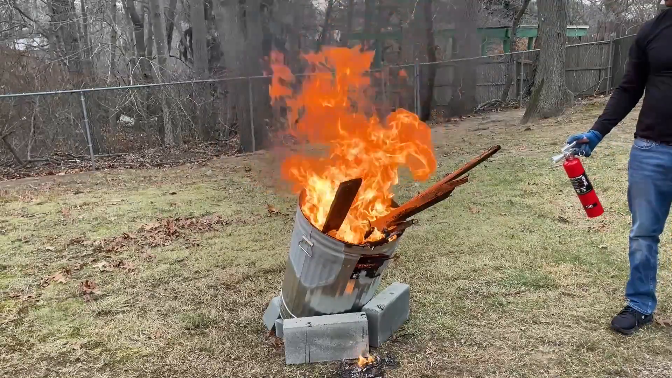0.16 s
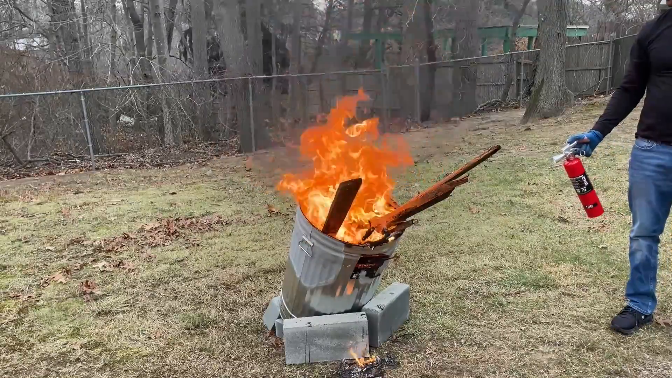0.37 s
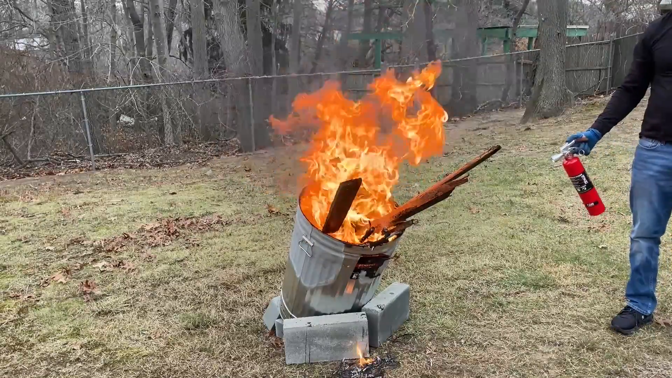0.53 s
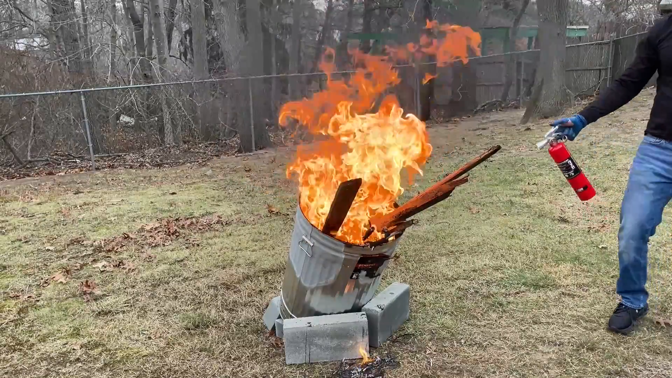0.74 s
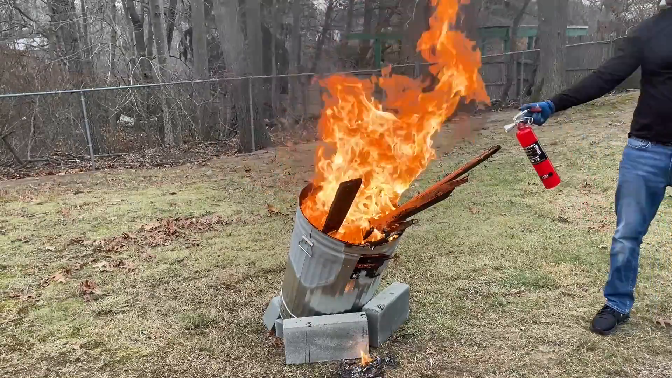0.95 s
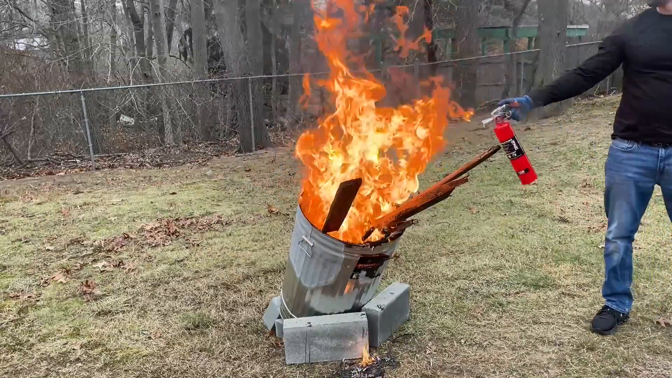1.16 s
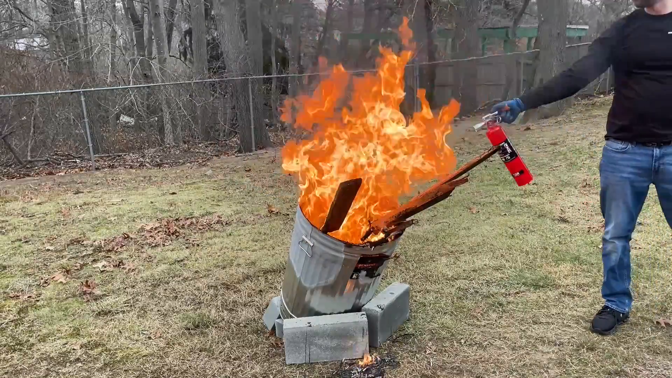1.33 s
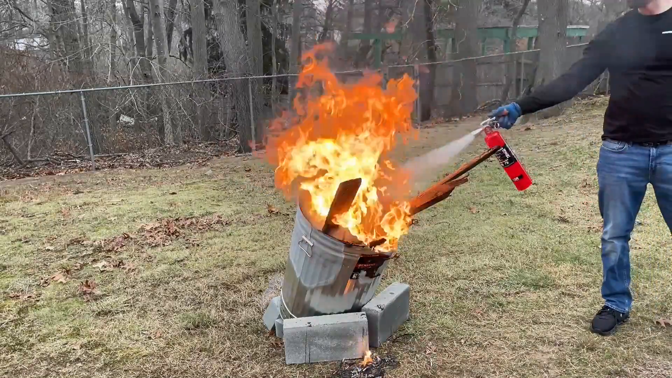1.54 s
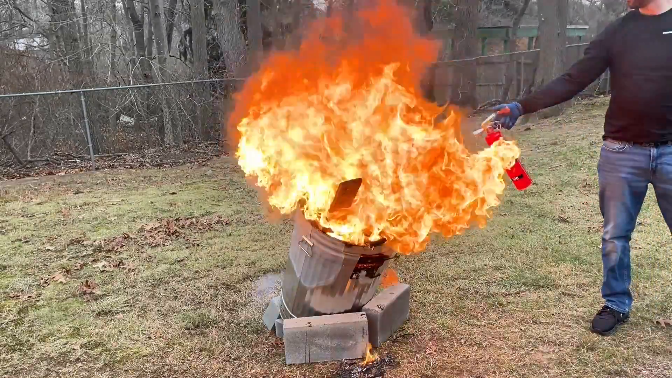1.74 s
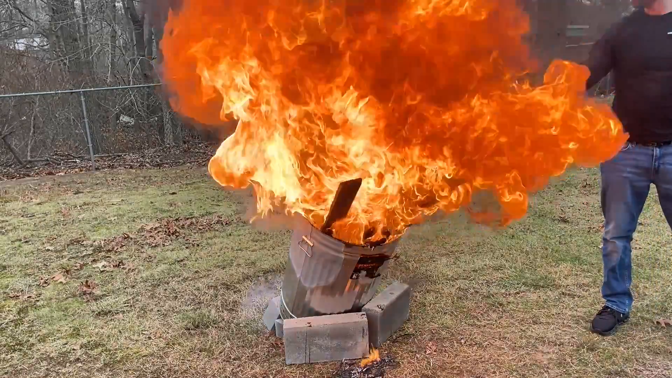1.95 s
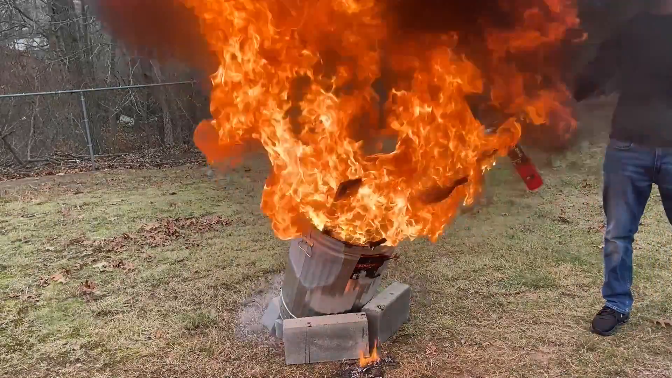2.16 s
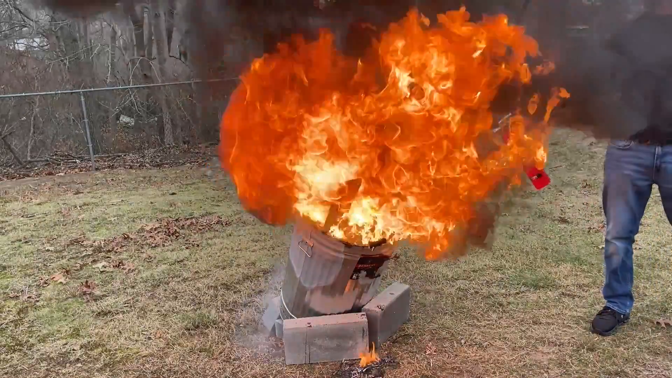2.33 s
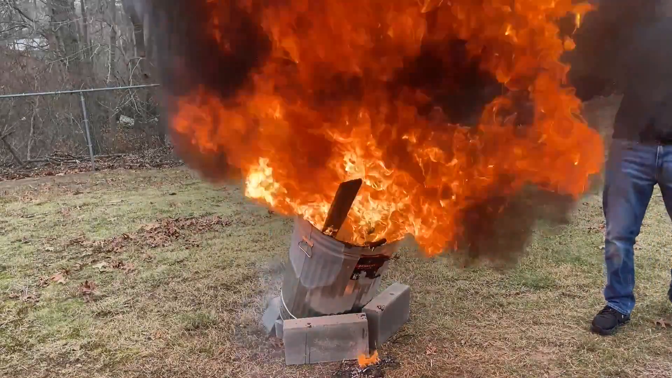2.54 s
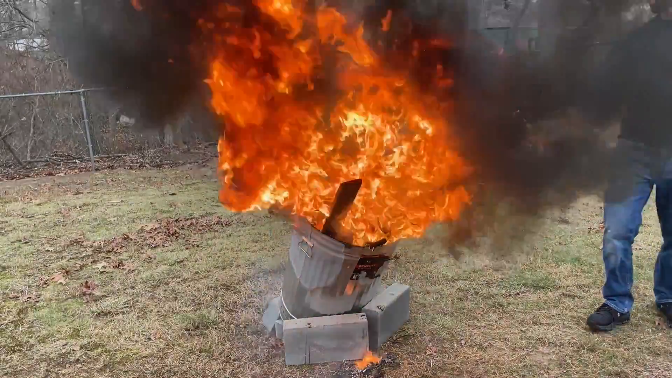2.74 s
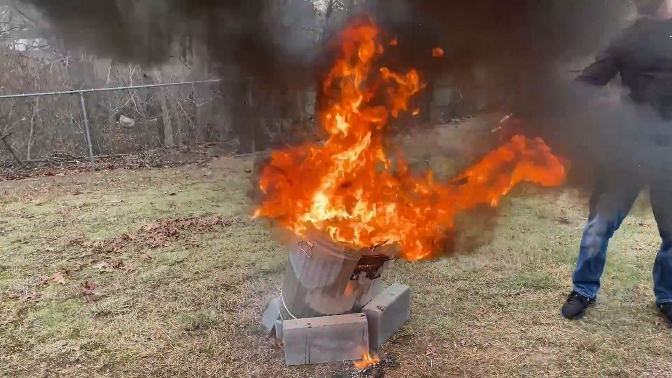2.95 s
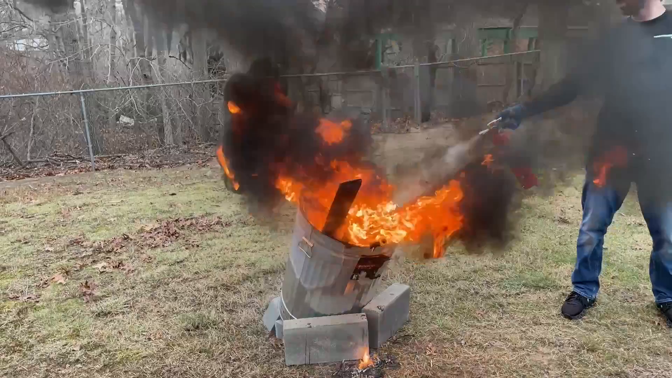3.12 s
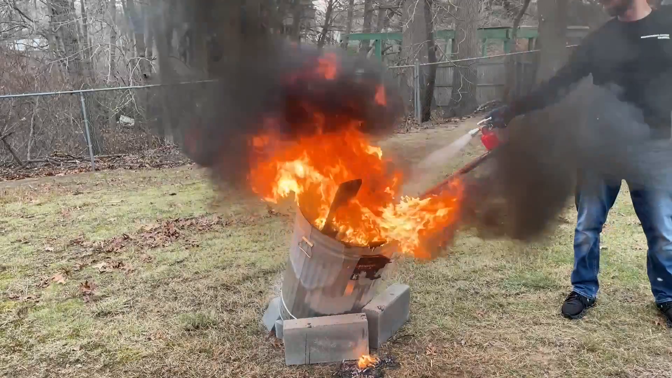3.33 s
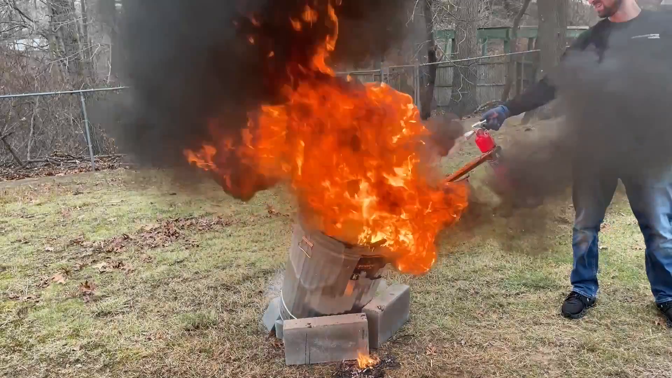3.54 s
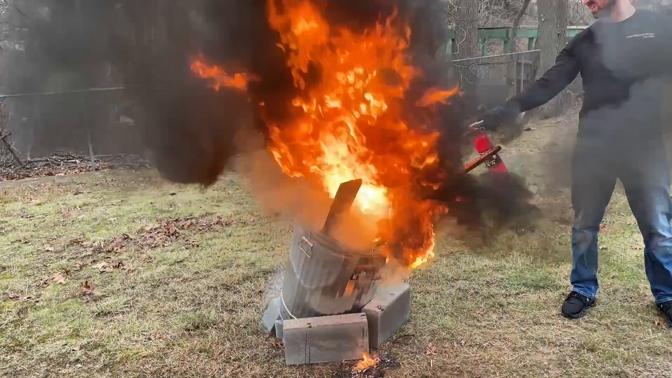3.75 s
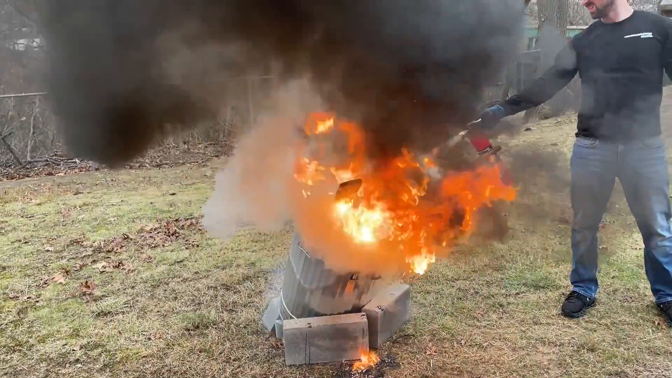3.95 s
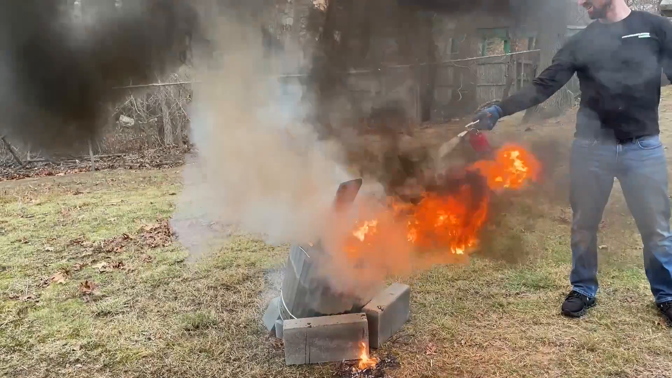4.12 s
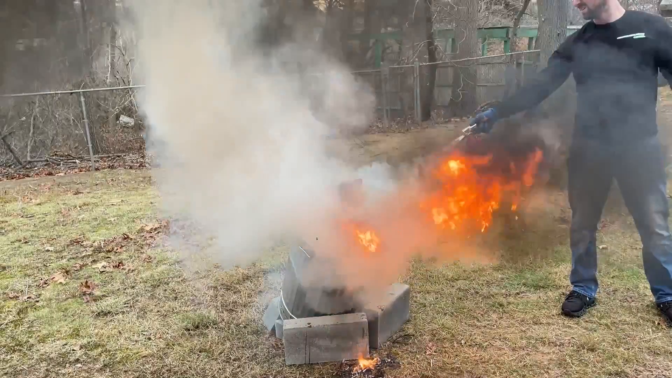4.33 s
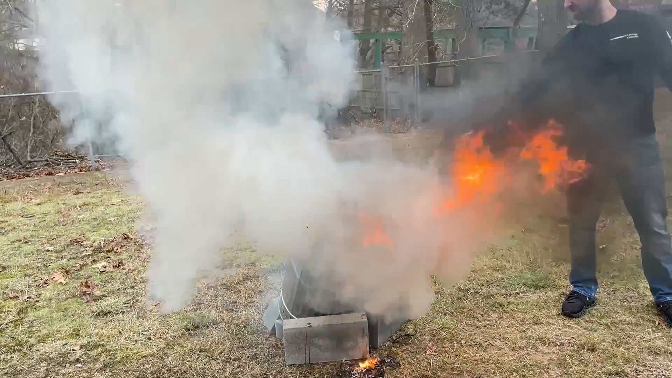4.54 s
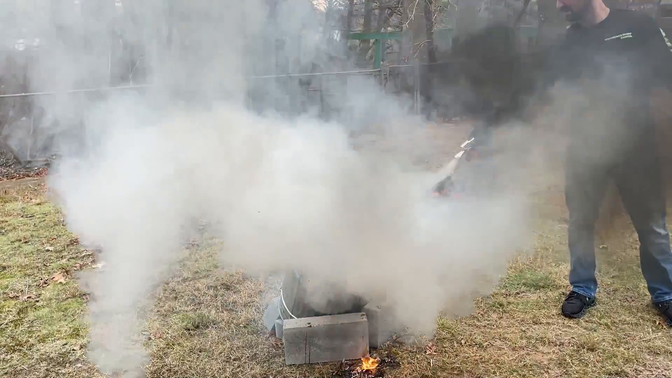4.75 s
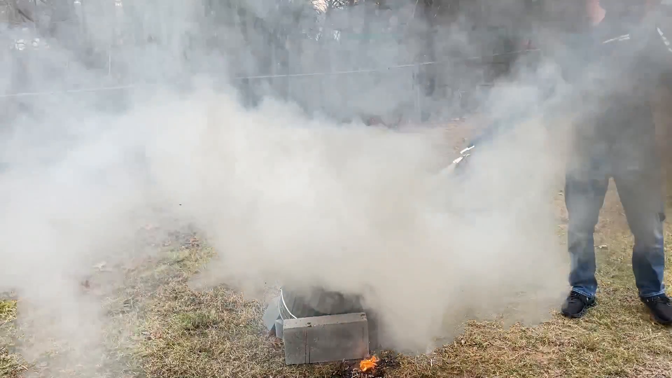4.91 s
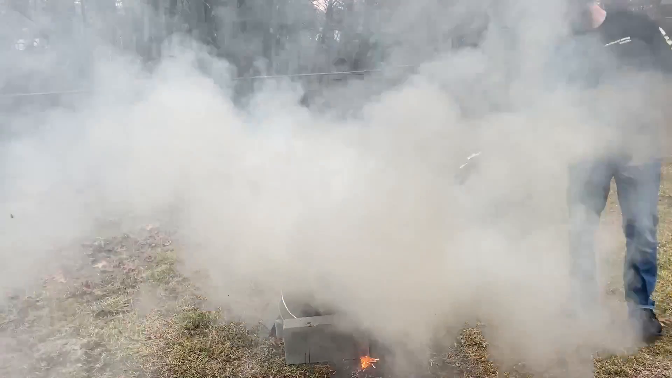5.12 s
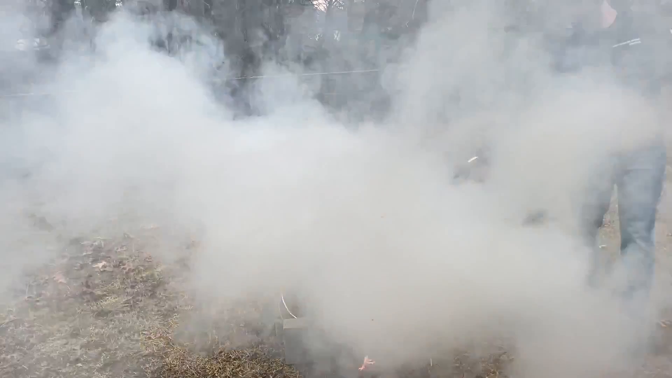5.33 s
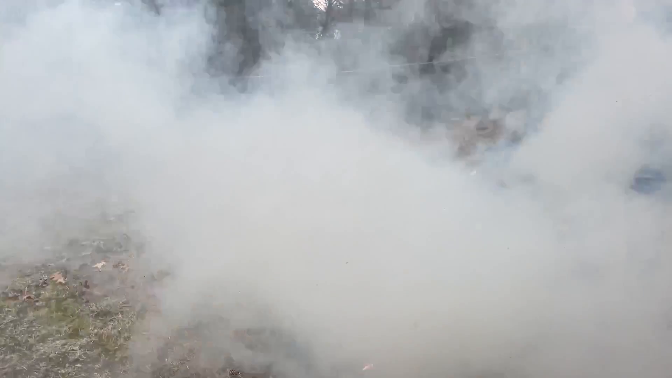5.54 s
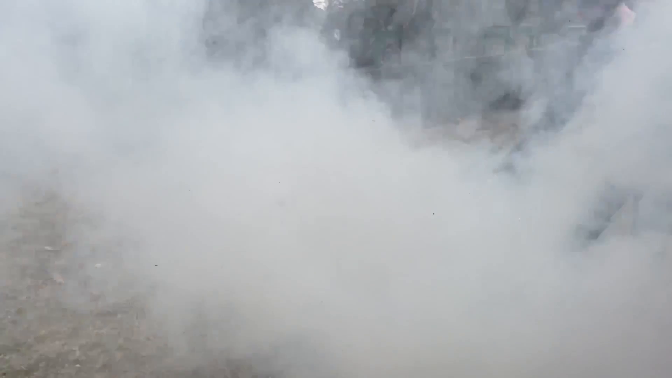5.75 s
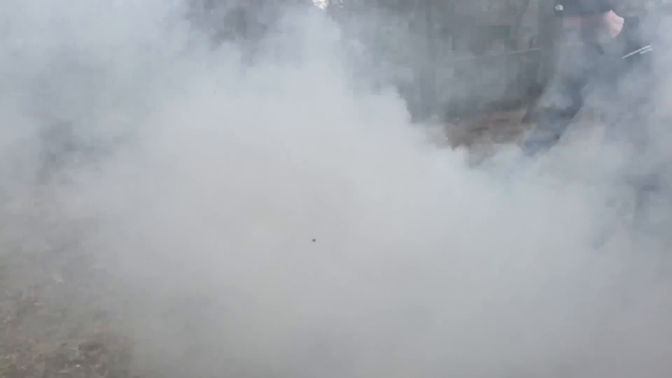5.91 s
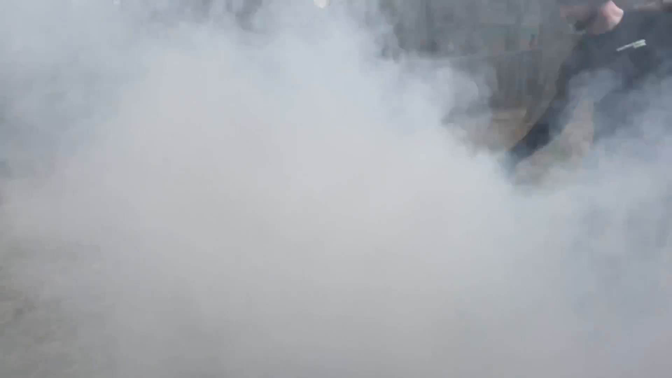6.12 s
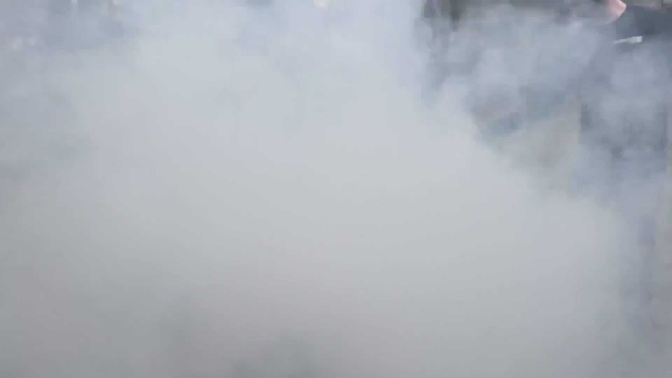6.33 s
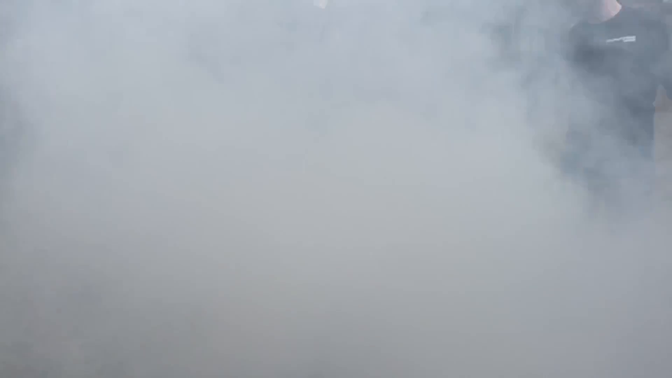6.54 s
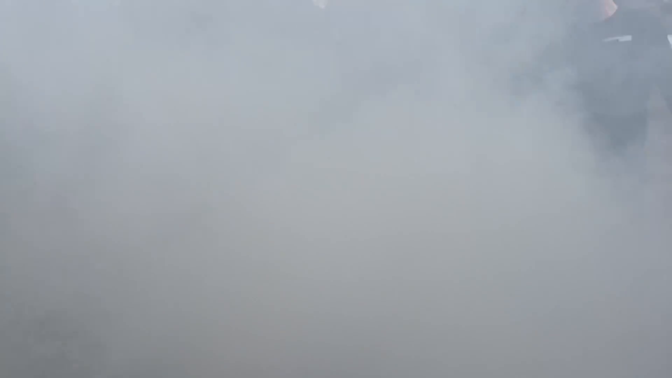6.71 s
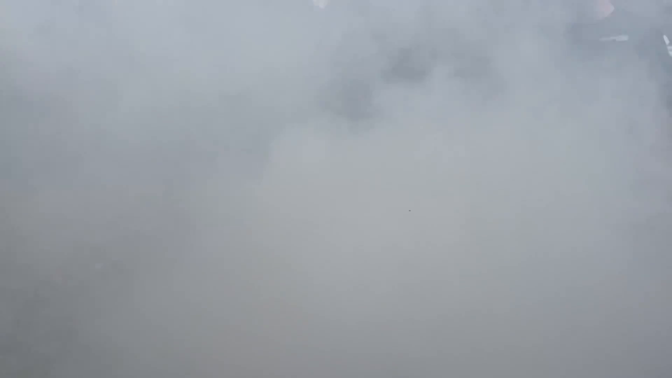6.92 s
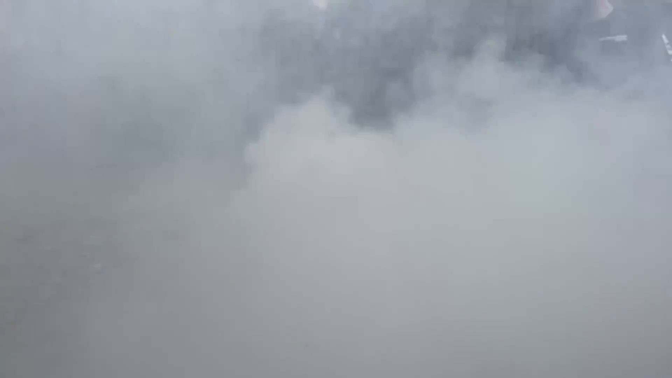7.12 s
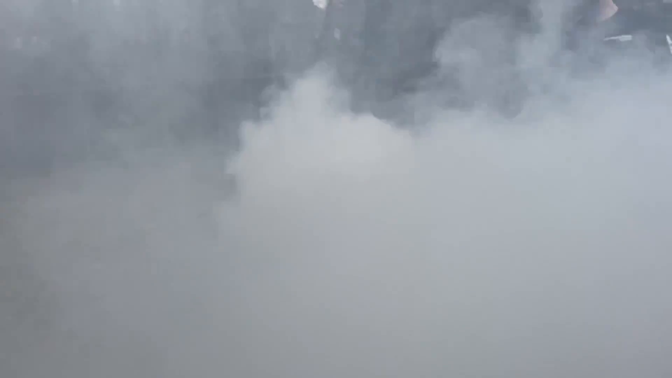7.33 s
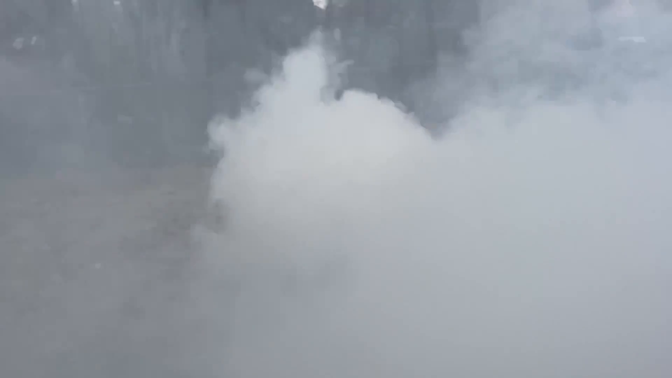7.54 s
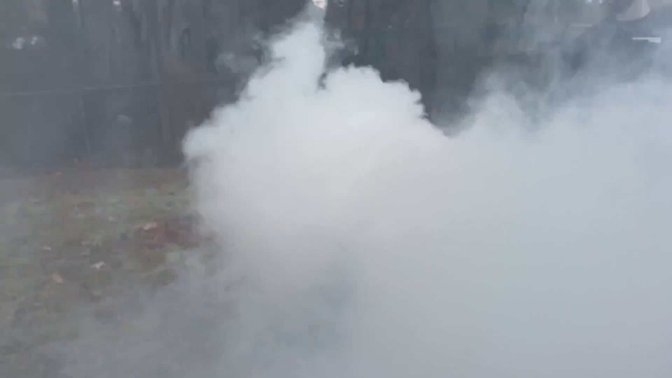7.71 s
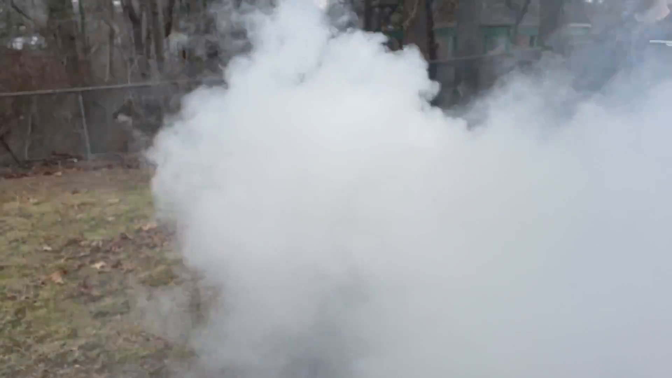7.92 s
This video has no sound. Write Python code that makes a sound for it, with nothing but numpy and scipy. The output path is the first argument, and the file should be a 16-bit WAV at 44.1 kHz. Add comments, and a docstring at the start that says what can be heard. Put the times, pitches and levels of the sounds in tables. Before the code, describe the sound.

A handheld extinguisher fires five bursts of rough, hissing powder spray into a rumbling outdoor bin fire, with sharp valve spits and clicks.

```python
"""A powder jet fires five bursts from a handheld extinguisher into a burning metal bin in a wooded yard.
The jet is coloured noise with a moving howl, gated by the valve and combed by a ground echo.
Noise slugs spit as the valve moves, cloud gusts push the microphone; noise snaps make short ticks, and
low thumps under the first and last spits. Flames rumble and roar as low noise in yard air that slowly
rises and falls with the sizzle, a bird whistles once, trees return a short tail.
A two-port microphone hears it from the left of the nozzle, rounds off peaks and limits the band."""
import sys
import numpy as np
from scipy import signal
from scipy.fft import rfft, irfft, next_fast_len
from scipy.io import wavfile
from scipy.ndimage import uniform_filter1d

SR = 44100
rng = np.random.default_rng(int(sys.argv[2]) if len(sys.argv) > 2 else 0)


def to_wav(sig):
    """Store sig (one row per channel, or 1-D mono) as 16-bit WAV at the path in sys.argv[1].

    Samples outside -1..1 are clipped; the rate is SR.
    """
    pcm = np.clip(np.atleast_2d(sig), -1, 1) * 32767
    pcm = np.round(pcm).astype(np.int16)
    wavfile.write(sys.argv[1], SR, pcm.T)  # frames by channels


N = 351609
T = np.arange(N) / SR
SIZE, HOP = 1024, 256  # noise-shaping frames, samples
HZ = np.fft.rfftfreq(SIZE, 1 / SR)[:, None]
FRAME_S = np.arange(N // HOP + 5) * HOP / SR


def amp(db):
    """Decibels to gain."""
    return 10 ** (np.asarray(db) / 20)


def evened(x):
    """Scales to rms 1."""
    return x / np.sqrt(np.mean(abs(x) ** 2) + 1e-20)


def read(points, hz):
    """Reads a spectrum table on a log-frequency axis."""
    f, value = np.transpose(points)
    return np.interp(np.log(hz + 1), np.log(f + 1), value)


def columns(rows, t):
    """Reads every column of a curve table at times t."""
    s, *rest = np.transpose(rows)
    return [np.interp(t, s, c) for c in rest]


def band(gain, lo_hz, hi_hz):
    """Rms that a band of unit noise has after this gain, frame by frame."""
    inside = (HZ > lo_hz) & (HZ < hi_hz)
    return np.sqrt((abs(gain) ** 2 * inside).sum(0))


def swell(s, rise_ms, t60, hold=0.):
    """Smooth rise, hold, then exponential fall by 60 dB in t60 seconds."""
    rise = np.clip((T - s) * 1000 / rise_ms, 0, 1) ** 2
    falling_s = np.maximum(T - s - rise_ms / 1000 - hold, 0)
    return rise * np.exp(-np.log(1000) * falling_s / t60)


# how alike the two ports hear noise: (frequency [Hz], likeness [0-1])
PORT_LIKENESS = [(60, 0.92), (400, 1), (1500, 0.99), (4200, 0.5), (7000, 0.63)]
# left port against right: (frequency [Hz], level [dB])
LEFT_SHADE = [(60, -1.5), (1500, -3), (3000, -4), (5500, -7.5), (7300, 0.5)]
# left port behind right: (frequency [Hz], phase lag [rad])
LEFT_LAG = [(150, .02), (900, 0.59), (2600, 0.98), (5600, 0.92), (7300, 0.12)]


def hiss(gain, patchy_db, flicker_db, pan_db=0.):
    """Noise as the two ports hear it, with drifting patches and flicker shared over wide bands."""
    a, b, c, d, patches, flicker = rng.standard_normal((len(FRAME_S), len(HZ), 6)).T
    # axis 0 is frequency, axis 1 is time
    patches = uniform_filter1d(uniform_filter1d(patches, size=10, axis=0), size=12, axis=1)
    flicker = uniform_filter1d(uniform_filter1d(flicker, size=120, axis=0), size=3, axis=1)
    motion = evened(amp(patchy_db * evened(patches) + flicker_db * evened(flicker)))
    same = np.clip(read(PORT_LIKENESS, HZ), 0, 1)
    right = a + 1j * b
    left = same * right + np.sqrt(1 - same ** 2) * (c + 1j * d)
    left = left * np.exp(-1j * read(LEFT_LAG, HZ))
    tilt = amp((read(LEFT_SHADE, HZ) + pan_db) / 2)  # half to each side
    z = np.array([left * tilt, right / tilt]) * gain * motion
    return signal.istft(z, nperseg=SIZE, noverlap=SIZE - HOP)[1][:, :N] / np.sqrt(.75)


# how fast the echo dies in each band: (frequency [Hz], t60 [s])
TREE_DECAY = [(500, 0.42), (8000, 0.57)]


def trees(x):
    """Sparse echoes of random sign from trunks and fence, each band dying at its own speed."""
    taps = np.zeros((2, SR))
    at = np.arange(200, SR - 20, 20) + rng.integers(0, 20, (2, (SR - 201) // 20))
    np.put_along_axis(taps, at, rng.choice([-1., 1.], at.shape), 1)
    hz, t, z = signal.stft(taps, SR, nperseg=256)
    fade = amp(-60 * t / read(TREE_DECAY, hz)[:, None])
    tail = signal.istft(z * fade, SR, nperseg=256)[1]
    return signal.fftconvolve(x, tail / np.linalg.norm(tail[0]), axes=1)[:, :N]


# fire over time: (time [s], rumble level [dB], flame roar level [dB])
FLAMES = [(0.0, -42, -54.5), (1.3, -42, -50), (1.5, -37.5, -46.5), (1.69, -27, -42.5), (1.8, -31.5, -45),
          (1.95, -36, -48.5), (2.33, -31, -44.5), (2.73, -42.5, -54), (3.7, -40.5, -55.5),
          (4.8, -47.5, -61.5), (5.75, -47.5, -67.5), (5.88, -51, -47), (6.1, -47.5, -64.5),
          (6.7, -44.5, -61), (7.06, -42.5, -59), (7.35, -57.5, -63.5), (7.97, -49.5, -70.5)]
# colour of the rumble: (frequency [Hz], relative density [dB per Hz])
RUMBLE_COLOUR = [(25, -40), (40, 14), (55, 37.5), (75, 18.5), (100, 15.5), (150, -12.5), (250, -59)]
# colour of the flame roar: (frequency [Hz], relative density [dB per Hz])
ROAR_COLOUR = [(80, 0), (150, 4), (300, -1.5), (480, -4), (650, -11.5), (1000, -14), (1300, -25),
               (4000, -29.5), (7000, -52)]
# colour of the yard air: (frequency [Hz], relative density [dB per Hz])
YARD_COLOUR = [(300, -6.5), (1000, 2), (1800, -4.5), (3500, -3.5), (5500, -7.5), (7300, -8), (7800, 1),
               (12000, -6.5), (16000, -8)]
# air of the yard with the hot bin sizzling under powder: (time [s], level [dB])
SIZZLE = [(0, -58), (3, -59), (5.5, -54), (6.3, -54), (7.5, -57)]


def flames():
    """Lumpy low rumble, flame roar above it, and the yard air, slowly rising and falling with the sizzle."""
    rumble_db, roar_db = columns(FLAMES, FRAME_S)
    air_db = columns(SIZZLE, FRAME_S)[0]
    rumble, roar, air = (amp(read(table, HZ)) for table in (RUMBLE_COLOUR, ROAR_COLOUR, YARD_COLOUR))
    # each level holds for the layer's own band
    rumble = rumble / band(rumble, 30, 130) * amp(rumble_db)
    roar = roar / band(roar, 150, 330) * amp(roar_db)
    air = air / band(air, 0, SR) * amp(air_db)
    return hiss(np.sqrt(rumble ** 2 + roar ** 2 + air ** 2), 1.35, 1.14)


# one far note: (time [s], length [s], pitch [Hz], level [dB])
BIRD = (6.16, .095, 2680, -62)


def bird():
    """A faint level whistle: one sine under a half-sine swell."""
    s, length, hz, db = BIRD
    window = np.sqrt(np.sin(np.pi * np.clip((T - s) / length, 0, 1)) ** 2)
    return amp(db) * window * np.sin(2 * np.pi * hz * T)


# short ticks, and low thumps under the first and last spits:
# (time [s], peak level [dB], pitch [Hz], t60 [s])
TICKS = [(0.193, -38, 10470, 0.034), (0.9573, -30.5, 8950, .09), (1.061, -38, 7330, .034),
         (1.338, -28.5, 500, .1), (2.5594, -31.5, 6000, 0.02), (2.7068, -29.5, 2650, 0.018),
         (2.9469, -38, 7000, 0.02), (2.9665, -44, 6000, .02), (7.226, -30.5, 480, 0.19),
         (7.46, -39, 1660, 0.06), (7.559, -51, 1680, .04), (7.5914, -46, 10900, .04)]
# ringing modes of the lever steel: (pitch [Hz], relative level [dB], t60 [s])
PIN = [(2600, -5, .08), (11000, -2, 0.084), (12100, -1, 0.26), (13900, 0, .2)]
PIN_S, PIN_DB = .9567, -45  # start s, level the modes are relative to


def ticks():
    """Short noise snaps around a pitch, faint random crackle, and one ring of lever steel."""
    out, t = np.zeros(N + SR), np.arange(4096) / SR
    # squaring the draw crowds the crackle towards the start
    crackle = [(a ** 2 * N / SR, -62 + 8 * b ** 2, 2500 * 4 ** c, .02) for a, b, c in rng.random((40, 3))]
    octave = np.log2(np.fft.rfftfreq(len(t), 1 / SR) + 1)
    for s, db, hz, t60 in TICKS + crackle:
        around_pitch = np.exp(-.5 * ((octave - np.log2(hz)) / 1.05) ** 2)
        snap = evened(irfft(rfft(rng.standard_normal(len(t))) * around_pitch))
        attack = np.minimum(t / 0.00053, 1)
        # halved because the peak is about twice rms
        out[round(s * SR):][:len(t)] += amp(db - 60 * t / t60) * attack * snap / 2
    t = np.arange(SR // 2) / SR
    ring = sum(amp(PIN_DB + db - 60 * t / t60) * np.sin(2 * np.pi * hz * t) for hz, db, t60 in PIN)
    out[round(PIN_S * SR):][:len(t)] += ring
    return np.array([amp(-2.5) * np.roll(out, 2)[:N], out[:N]])  # left is softer and two samples late


# gusts of powder cloud on the microphone: (time [s], peak level [dB], pitch [Hz])
PUSHES = [(4.96, -33, 60.5), (5.27, -39, 64), (5.44, -34, 51.6), (5.65, -38, 65.2), (5.71, -37, 48),
          (6.703, -27, 98), (6.75, -36, 55), (6.915, -26, 64.3), (6.966, -31.5, 67), (7.01, -32.5, 161)]
PUSH_CYCLES = 2.74  # swings in one push


def pushes():
    """A few slow pressure swings under a smooth window."""
    out = 0
    for s, db, hz in PUSHES:
        window = np.sin(np.pi * np.clip((T - s) * hz / PUSH_CYCLES, 0, 1)) ** 2
        out = out + amp(db) * window * np.sin(2 * np.pi * hz * (T - s))
    return out


# slugs of gas spat from the nozzle: (time [s], level [dB], rise [ms], t60 [s],
# treble against level [dB], pipe ring against level [dB])
SPITS = [(1.332, -15.5, 14.5, 0.045, 4.5, 2.5), (1.358, -27.5, 4.7, .04, -10, -1),
         (1.963, -33, 10, 0.098, -36, -4.5), (2.269, -25, 8.3, 0.051, -50, -27),
         (2.993, -47, 1.8, 0.12, -6, -17), (2.999, -23.5, 14, 0.092, -21, 0.5),
         (6.647, -32, 3.5, 0.27, -42, -5), (6.673, -27.5, 19.4, 0.12, -38, 2.5),
         (7.218, -26, 4.5, 0.14, -30, -21)]
PIPE_HZ, PIPE_WIDTH_HZ = 1770, 130  # the nozzle pipe rings when a slug passes


def spits():
    """Each slug is a short rush of air that also rings the nozzle pipe."""
    hz = np.fft.rfftfreq(SR * 8, 1 / SR) + 1
    body_shape = 1 / (1 + (1450 / hz) ** 4) / (1 + (hz / 4500) ** 2)
    top_shape = 1 / (1 + (6000 / hz) ** 4)
    pipe_shape = 1 / (1 + ((hz - PIPE_HZ) / PIPE_WIDTH_HZ) ** 2)
    air = rfft(hiss(1., 1.5, 0), SR * 8)
    body, top, pipe = (evened(irfft(air * g)[:, :N]) for g in (body_shape, top_shape, pipe_shape))
    body_gain = top_gain = pipe_gain = 0
    for s, db, ms, t60, top_db, pipe_db in SPITS:
        burst = swell(s, ms, t60)
        body_gain = body_gain + amp(db) * burst
        top_gain = top_gain + amp(db + top_db) * burst
        pipe_gain = pipe_gain + amp(db + pipe_db) * swell(s + 0.0016, ms, t60)  # ring starts 1.6 ms later
    return body_gain * body + top_gain * top + pipe_gain * pipe


# bounce off the ground as the nozzle moves: (time [s], lag [ms], strength [0-1])
NOZZLE = [(1.6, 2.7, 0.6), (1.95, 1.43, 0.2), (3.3, 2.04, 0.06), (3.5, 2.66, .3), (4.5, 2.56, 0.36),
          (5.42, 2.36, 0.46), (5.7, 1.85, 0.27), (6.03, 1.84, 0.37), (6.3, 2.6, 0.27)]


def ground(x):
    """A duller copy arrives off the turf a moment later and combs the spectrum."""
    lag_ms, strength = columns(NOZZLE, T)
    dull = signal.oaconvolve(x, signal.firwin(7, 5000, fs=SR)[None], "same")
    late = np.array([np.interp(T - lag_ms / 1000, T, c) for c in dull])
    return (x + strength * late) / np.sqrt(1 + strength ** 2)


# valve held open: (open [s], shut [s], rise [ms], t60 of the thin top hiss [s], top hiss level [dB])
VALVE = [(1.327, 1.605, 8.2, 0.24, 5), (1.956, 2.286, 13, 0.48, -1.5), (2.998, 5.413, 5.9, 0.31, -1.5),
         (5.716, 6.026, 18.6, 0.54, -2.5), (6.327, 7.206, 19.6, 0.067, -3.5)]
# the jet swells when it strikes into the bin: (time [s], level of 900-3000 Hz [dB])
JET = [(1.385, -40), (1.6, -32.5), (2.0, -42), (2.24, -33), (3.04, -32.5), (3.11, -38.5), (3.2, -33.5),
       (3.28, -35.5), (3.43, -30), (3.62, -39), (3.93, -37), (4.15, -34.5), (4.26, -40), (4.4, -40),
       (4.5, -38), (4.8, -38), (4.92, -34), (5.4, -34.5), (5.745, -35), (5.975, -33.5), (6.36, -36),
       (6.674, -34.5), (7.2, -35)]
# colour of the jet before the changes below: (frequency [Hz], relative density [dB per Hz])
JET_COLOUR = [(150, -37.5), (300, -13.5), (470, -6.5), (600, -9.5), (780, -3), (1000, -4), (1400, -2),
              (2000, -4), (3200, -3), (5000, -6.5), (7300, -11), (7800, -7), (13000, -15.5), (16000, -27.5)]
# howl in the hollow the jet is aimed at, and how dull the jet sounds from there:
# (time [s], pitch [Hz], width [Hz], treble tilt [dB per octave])
HOWL = [(2.3, 1780, 195, 1), (3.05, 1750, 200, -2), (3.21, 1600, 250, 1.5), (3.3, 1340, 500, -3.5),
        (3.42, 1390, 550, -3), (3.5, 1470, 450, 0.5), (3.7, 1583, 200, 0.5), (4.15, 1790, 300, -0.5),
        (4.6, 1740, 112, -1), (5.41, 1760, 112, .5), (5.72, 1640, 150, 2), (6.03, 1610, 149, 1.5),
        (6.35, 1800, 260, 1.5)]
# the jet drifts between the sides: (time [s], left against right [dB])
DRIFT = [(2.5, 1), (4.5, -1), (6.2, -2), (7.2, 0.5)]
SHUT_T60, TOP_HZ = 0.023, 6800  # s, Hz: the body stops at once; gas above this pitch leaks on
USUAL_DB = -37  # jet level from which swell is counted
TREBLE_DB, WASH_DB, HOWL_DB = -3.5, -1.5, 6  # colour changes at the usual level
# dB per dB of swell: treble and wash stay behind, the howl grows
TREBLE_SLOPE, WASH_SLOPE, HOWL_SLOPE = -0.8, -0.65, 0.36


def jet():
    """Turbulent powder jet with a moving howl, gated by the valve."""
    swelling = columns(JET, FRAME_S)[0] - USUAL_DB
    howl_hz, width_hz, tilt = columns(HOWL, FRAME_S)
    octaves = np.log2(np.clip(HZ, 1800, 4000) / 1800)
    howl = 1 / (1 + ((HZ - howl_hz) / width_hz) ** 2)
    treble = 1 / (1 + (2600 / (HZ + 1)) ** 4)
    wash = 1 / (1 + (HZ / 1500) ** 8)
    colour_db = read(JET_COLOUR, HZ) + tilt * octaves
    colour_db = colour_db + treble * (TREBLE_DB + TREBLE_SLOPE * swelling)
    colour_db = colour_db + wash * (WASH_DB + WASH_SLOPE * swelling)
    colour_db = colour_db + howl * (HOWL_DB + HOWL_SLOPE * swelling)
    gain = amp(colour_db)
    gain /= band(gain, 900, 3000)
    stream = hiss(gain, 2.03, 1.4, columns(DRIFT, FRAME_S)[0]) * amp(columns(JET, T)[0])
    highpass = signal.firwin(63, TOP_HZ, pass_zero=False, fs=SR)
    top = signal.oaconvolve(stream, highpass[None], "same")
    flow = leak = 0
    for opened, shut, ms, top_t60, top_db in VALVE:
        hold = shut - opened - ms / 1000
        flow = flow + swell(opened, ms, SHUT_T60, hold=hold)
        leak = leak + amp(top_db) * swell(opened, ms, top_t60, hold=hold)
    return (stream - top) * flow + top * leak


TREES_DB, SPITS_TREES_DB = -9.5, -7  # echo level; spits reach the trees less


def scene():
    """All sources; jet, spits and ticks feed the trees, and the direct jet has its ground bounce."""
    stream, slugs, snaps = jet(), spits(), ticks()
    echoes = amp(TREES_DB) * trees(stream + snaps + amp(SPITS_TREES_DB) * slugs)
    return ground(stream) + slugs + snaps + echoes + flames() + pushes() + bird()


# left phase of the treble that both channels share: (frequency [Hz], turn [half-turns])
TREBLE_TURN = [(7500, 1), (8900, 1), (10300, 2), (11500, 2), (12600, 3), (14250, 3), (14500, 4), (16500, 4)]
CEILING = .9  # the input stage rounds off peaks near this value
BLEND_HZ = 120  # softness of the crossover into shared treble
FLOOR_HZ, EDGE_HZ = 38.8, 15850  # deepest bass drops below, band limit above


def record(dry):
    """Peaks round off; both channels share treble with a turning phase; deep bass drops; band limit."""
    size = next_fast_len(N)
    z = rfft(CEILING * np.tanh(dry / CEILING), size)
    hz = np.fft.rfftfreq(size, 1 / SR)
    edge, turns = np.transpose(TREBLE_TURN)
    left_turn = np.exp(1j * np.pi * np.interp(hz, edge, turns))
    shared = z[1] * np.array([left_turn, np.ones_like(hz)])
    share = .5 + .5 * np.tanh((hz - edge[0]) / BLEND_HZ)
    bass_cut = 1 + (FLOOR_HZ / (hz + 1)) ** 6
    heard = irfft((share * shared + (1 - share) * z) / bass_cut, size)[:, :N]
    lowpass = signal.firwin(511, EDGE_HZ, window=("kaiser", 9), fs=SR)
    return signal.oaconvolve(heard, lowpass[None], "same")


dry = scene()
out = record(dry)
to_wav(out)
```